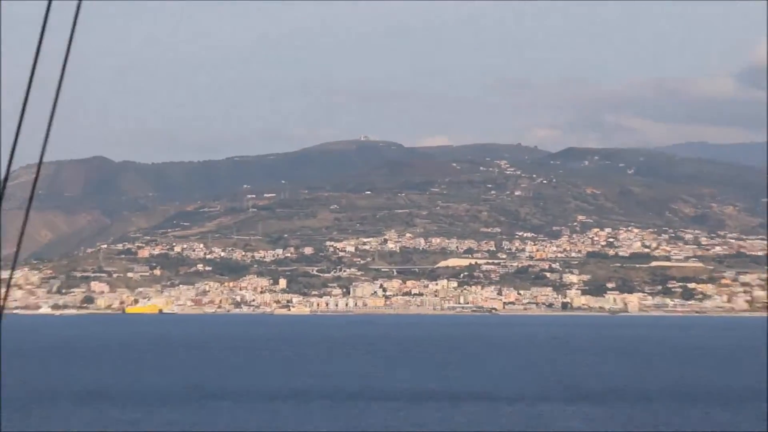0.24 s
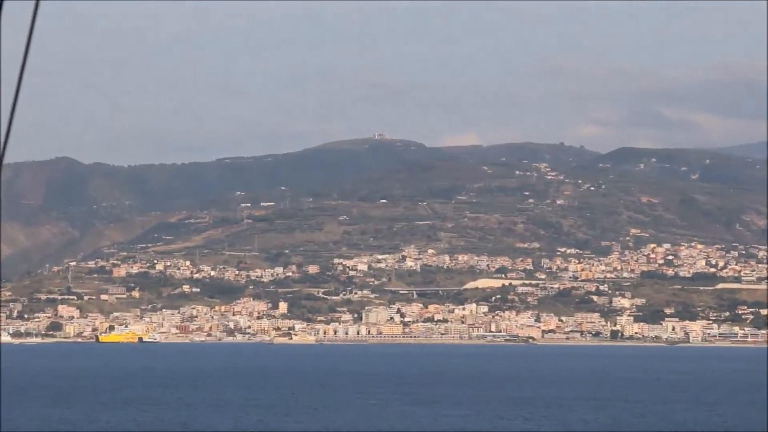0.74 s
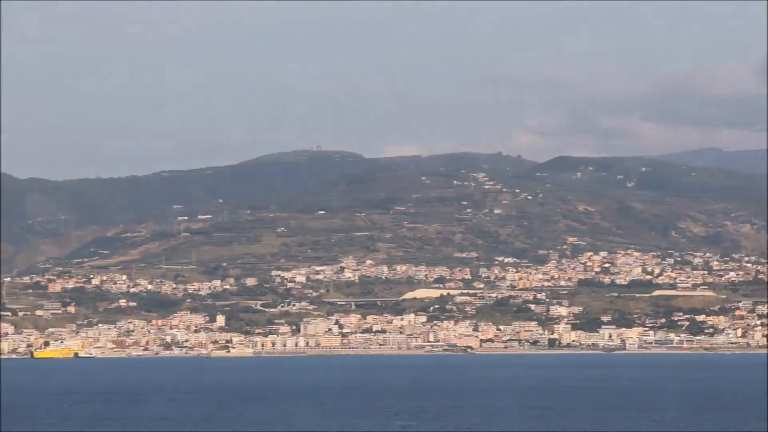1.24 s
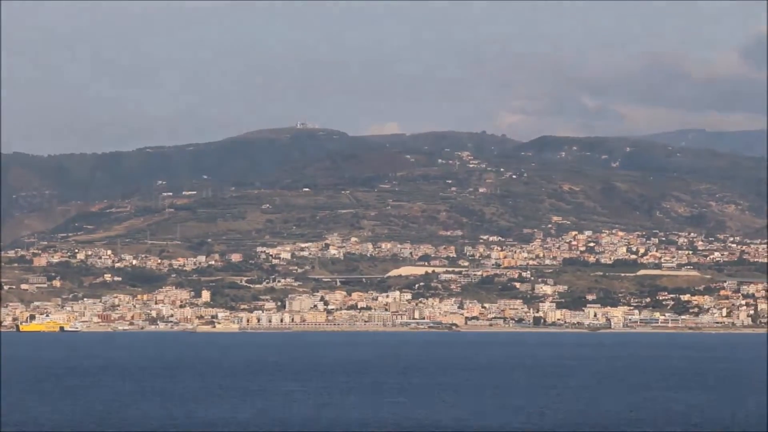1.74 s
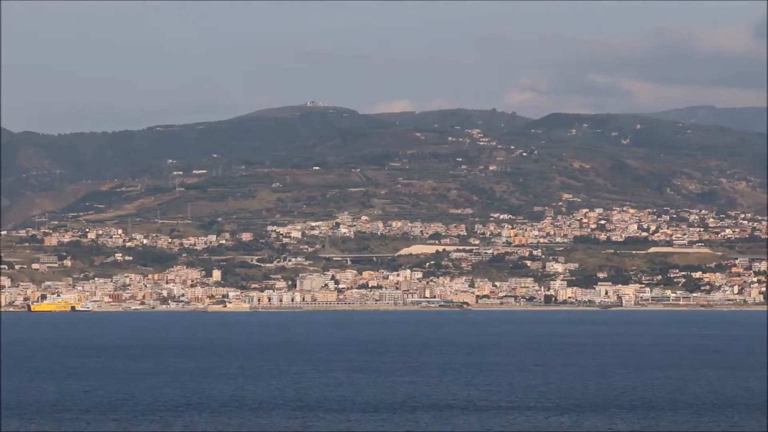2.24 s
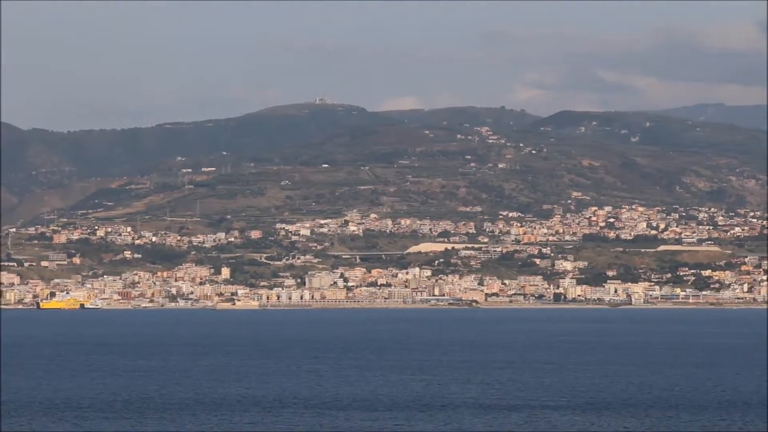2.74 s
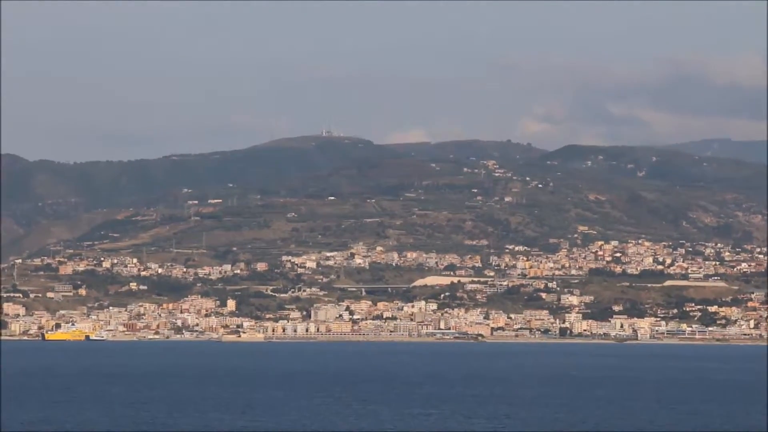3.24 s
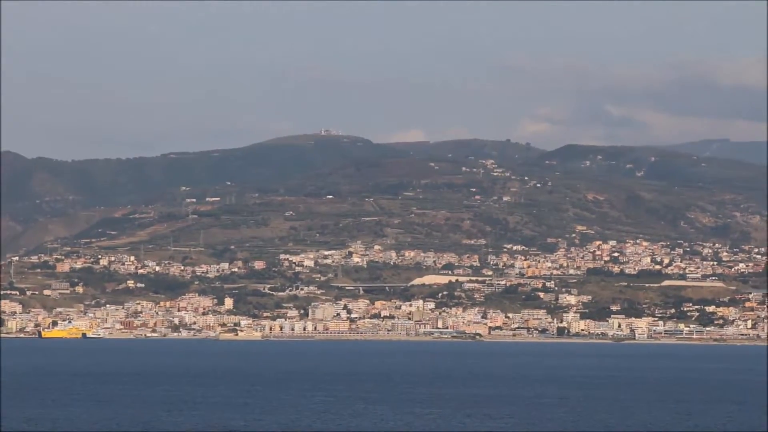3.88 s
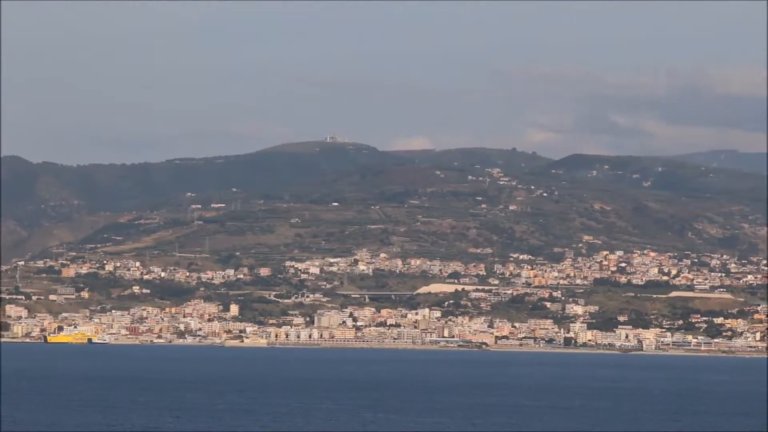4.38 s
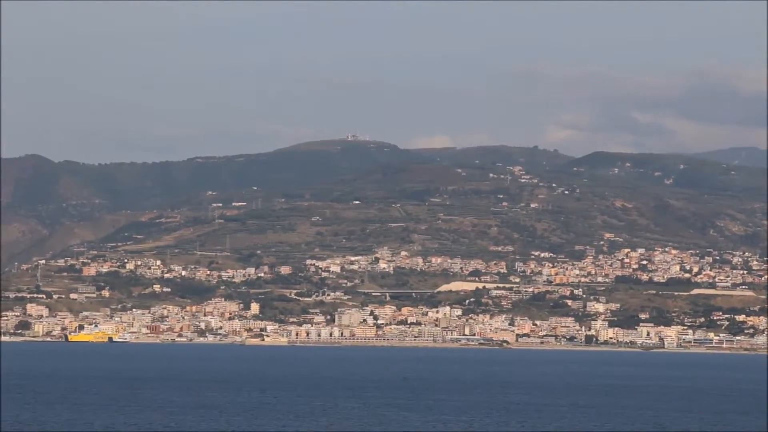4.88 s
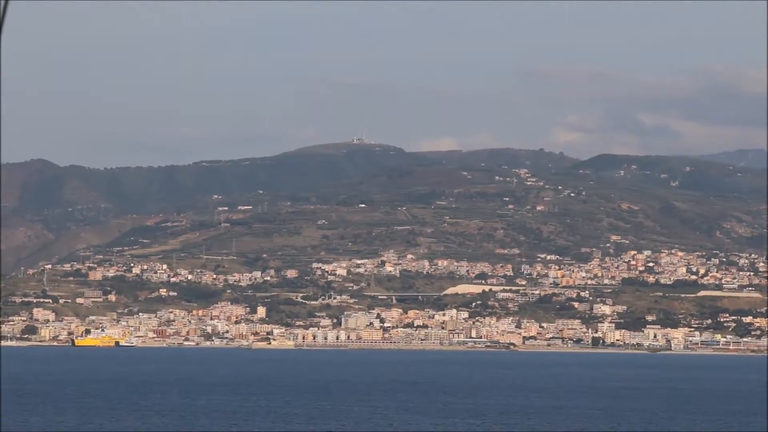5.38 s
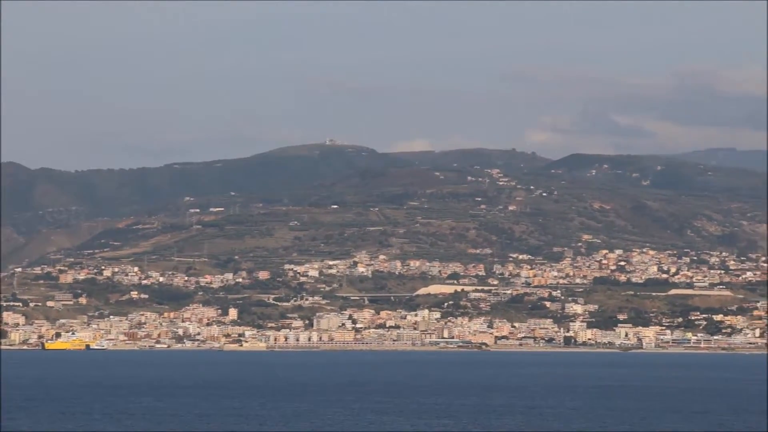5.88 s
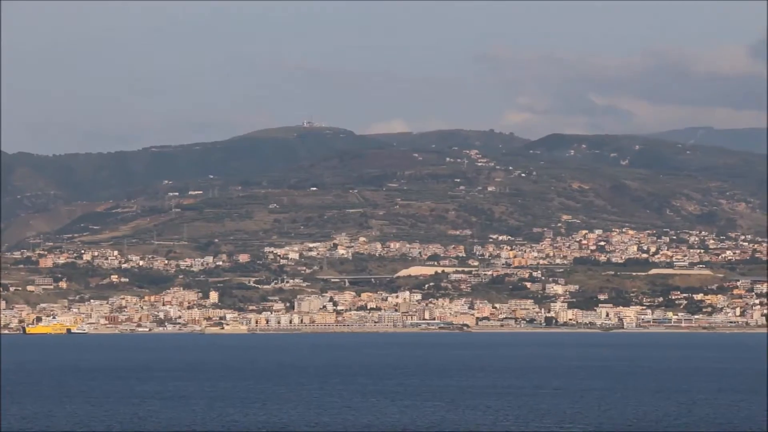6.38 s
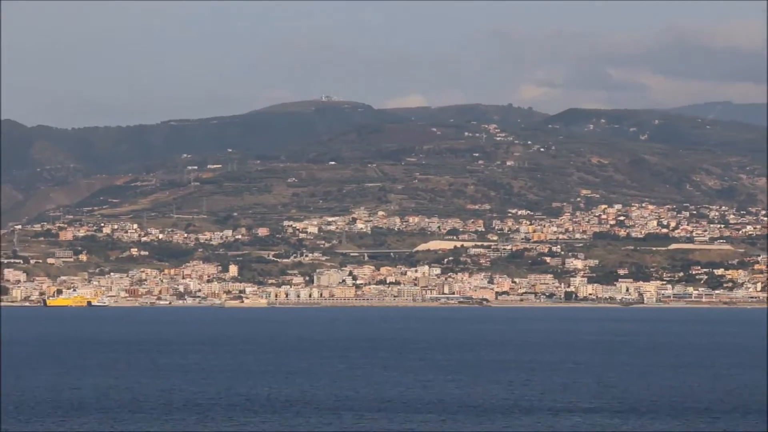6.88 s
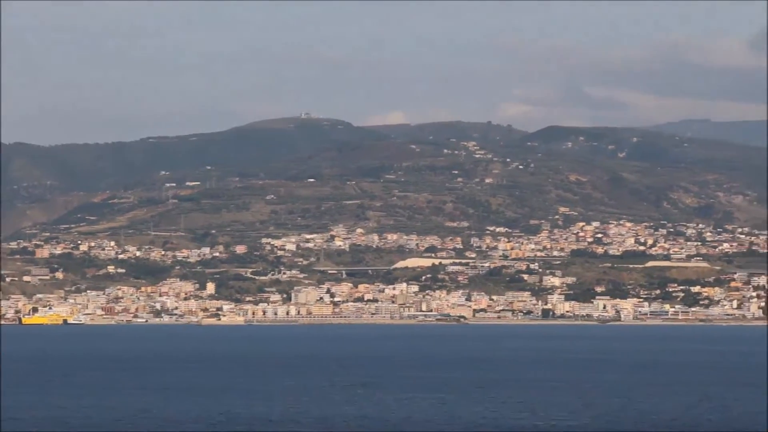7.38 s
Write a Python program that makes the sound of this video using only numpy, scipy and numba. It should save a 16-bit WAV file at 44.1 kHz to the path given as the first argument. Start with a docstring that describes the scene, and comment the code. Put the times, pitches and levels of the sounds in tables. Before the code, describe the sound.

On a ship's deck at sea, wind blows straight onto a stereo microphone, making a continuous rumble with soft thumps and crackles. It opens with a sharp, crackling gust on the right, followed by a very faint, brief high whistle. The buffeting carries on steadily, with scattered dry ticks from something loose and a soft wash of water behind it, then turns brighter on the right again at the end.

```python
"""Wind rumbles, thumps and crackles on the open deck of a moving ship, over a hiss of sea and air.
It hits the two ports (openings) of a small stereo microphone, each on its own. Swirls of air, called
eddies, sound louder and brighter when swept past faster: sharp ones crackle in one port at a time,
large ones thump. Something loose nearby ticks in both ports, and a thin, faint whistle comes and goes."""
import sys
import numpy as np
from scipy import signal
from scipy.fft import rfft, irfft, next_fast_len
from scipy.io import wavfile
from scipy.ndimage import uniform_filter1d
from numba import njit

SR = 44100
rng = np.random.default_rng(int(sys.argv[2]) if len(sys.argv) > 2 else 0)


def put_to_file(sound):
    """Save the sound as 16-bit audio at rate SR, in the file named by the first command-line argument."""
    columns = np.atleast_2d(sound).T  # one column per channel
    safe = np.clip(columns, -1, 1)
    whole_steps = np.round(safe * 32767)
    wavfile.write(sys.argv[1], SR, whole_steps.astype(np.int16))


N = 336262

# The gusts at each port. One octave more means air moving twice as fast.
# (time [s], left speed [octaves], right speed [octaves], left rumble [dB], right rumble [dB])
GUSTS = [(0.0, -0.11, 0.29, -15.5, -15), (0.202, 0.52, 0.1, -17.5, -17.5), (0.25, 0.4, 0.5, -17.5, -18),
         (0.348, -0.14, 0.14, -19, -21), (0.499, 0.3, 0.11, -17, -14), (0.591, 0.4, -0.1, -14, -20),
         (0.619, 0.74, 1.2, -13, -19), (0.699, 0.6, 1.3, -15.5, -18), (0.8, 0.7, 1.76, -17.5, -17),
         (0.932, -0.16, 1.16, -18.5, -19.5), (1.052, 0.48, 0.49, -16.5, -19.5), (1.253, 0.3, 0.3, -17, -19),
         (1.33, 0.3, 0.3, -17, -17), (1.498, 0.3, 0.32, -18, -18), (1.9, 0.6, 0.2, -15, -18),
         (2.048, 0.68, 0.1, -17, -16.5), (2.105, 0.38, 0, -17.5, -21), (2.202, 0.92, 0.013, -16.5, -17),
         (2.552, 0.6, 0.1, -18.5, -17), (2.9, 0.46, 0.1, -15, -18), (3.08, 0.7, 0.4, -16, -19),
         (3.25, 0.94, 0.49, -18, -18.5), (3.459, 0.8, 0.2, -17, -17.5), (3.52, 0.3, 0, -19.5, -19.5),
         (3.6, 0.5, 0.11, -15.5, -17.5), (3.748, 0.4, 0.2, -16, -16.5), (3.87, 0.4, 0.3, -16.5, -21.5),
         (3.919, 0.021, 0.1, -20.5, -16.5), (3.997, 0.29, 0.31, -14.5, -19.5),
         (4.15, 0.25, 0.5, -17.5, -14), (4.298, 0.17, 0.67, -15, -14.5), (4.45, 0.3, 0.3, -15, -17.5),
         (4.597, 0.54, 0.043, -17.5, -14.5), (4.902, 0.54, 0.71, -15, -19.5), (5.15, 0.31, 0.4, -16, -17),
         (5.403, 0.39, 0.22, -16, -19), (5.698, 0.48, 0.3, -16, -17), (6.0, 0.34, 0.36, -14.5, -20),
         (6.252, 0.4, 0.4, -15, -17.5), (6.499, 0.49, 0.5, -15.5, -16.5), (6.851, 0.28, 0.37, -17, -19),
         (7.0, 0.47, 1.54, -20, -15.5), (7.18, -0.23, 0.84, -20, -22), (7.23, -0.1, -0.1, -13, -23),
         (7.26, -0.04, -0.14, -14, -16), (7.295, -0.022, 0, -22, -20.5), (7.351, -0.26, 1.1, -12, -22),
         (7.398, -0.3, 0.8, -15, -21.5), (7.45, -0.3, 1.3, -15.5, -20), (7.62, -0.49, 1.38, -16, -20)]


def undb(db):
    """Turns decibels into a number to multiply by."""
    return 10 ** (np.asarray(db) / 20)


def unit(x):
    """Scales x to an average strength (rms) of 1."""
    return x / np.sqrt(np.mean(x ** 2))


def along(times, values):
    """Joins points with straight lines, giving a value for every sample."""
    return np.interp(np.arange(N) / SR, times, values)


@njit
def low_pass(x, hz, damping):
    """Dulls the sound above a frequency that can move every sample."""
    out, band, low = np.empty(len(x)), 0., 0.
    for i in range(len(x)):
        g = np.tan(np.pi * hz[i] / SR)
        change = (band + g * (x[i] - low)) / (1 + g * (g + damping))
        out[i] = low + g * change
        band, low = 2 * change - band, low + 2 * g * change
    return out


def colour(x, points):
    """Sets the tone of x from (frequency [Hz], level [dB]) points."""
    hz, db = np.transpose(points)
    size = next_fast_len(N)
    log_hz = np.log(np.arange(size // 2 + 1) * SR / size + 1)
    return irfft(rfft(x, size) * undb(np.interp(log_hz, np.log(hz), db)), size)[..., :N]


def band_rms(x, low_hz, high_hz):
    """Strength of x between two frequencies."""
    band = signal.butter(4, [low_hz, high_hz], "band", fs=SR, output="sos")
    return np.std(signal.sosfilt(band, x))


def wobble(per_second):
    """A smooth random curve of strength 1 that changes this often."""
    hold = int(SR / per_second)
    steps = np.repeat(rng.standard_normal(N // hold + 1), hold)
    return unit(uniform_filter1d(uniform_filter1d(steps, hold), hold)[:N])


def noise_pair(alike):
    """Left and right noise, from unrelated (0) to the same (1)."""
    mid, side = rng.standard_normal((2, N))
    return np.sqrt(1 + alike) * mid + np.sqrt(1 - alike) * side * np.array([[1], [-1]])


def stirring(unrest, swirls_per_second=900, spread_db=2.3, largest_db=9):
    """Tiny swirls push in or out over a fine, even noise; with less unrest their sizes are more alike."""
    arrives = rng.random(N) < swirls_per_second / SR
    size_db = np.minimum(spread_db * (1 + unrest * (rng.exponential(size=N) - 1)), largest_db)
    swirls = arrives * np.sign(rng.standard_normal(N)) * undb(size_db)
    power_share = .88 * (1 + unrest) / 2
    return np.sqrt(power_share) * unit(swirls) + np.sqrt(1 - power_share) * rng.standard_normal(N)


def rushes(port, eddy_rows, core_ms=7.1, slap_s=0.000091):
    """Air at a port spurts and drops; each sharp eddy speeds it up, slaps the port and calms the rest."""
    t = np.arange(N) / SR
    sharp, core, slaps = np.zeros((3, N))
    signs = np.sign(rng.standard_normal(len(eddy_rows)))
    for (time, side, octaves, ms), sign in zip(eddy_rows, signs):
        if round(side) == port:
            near = slice(max(int((time - .05) * SR), 0), int((time + .05) * SR))
            age = t[near] - time
            span_ms = ms * np.where(age < 0, 0.78, 1)  # it comes faster than it goes
            sharp[near] = np.maximum(sharp[near], octaves * np.exp(-(1500 * age / span_ms) ** 2))
            # long eddies sputter on around a short, steady core
            core[near] = np.maximum(core[near], octaves * np.exp(-(1500 * age / min(ms, core_ms)) ** 2))
            slaps[near] += sign * 0.56 * octaves * np.exp(-(age / slap_s) ** 2)
    spurts = .15 * wobble(40) + .36 * np.maximum(wobble(300), -.6) - .21
    lulls = 0.13 * np.minimum(wobble(29), 0) * np.exp(-2 * sharp)
    unrest = np.exp(-1.04 * core)  # 1 in open wind, less inside an eddy
    return sharp + unrest * spurts + lulls, slaps, unrest


def buffeting(port, eddy_rows, rumble_hz=121.8, finest_hz=1265, port_hz=7850):
    """Swirling air rumbles past a port: the faster it moves, the brighter it sounds."""
    fastest_octaves, db_per_octave = 3.14, 1.5
    times, *columns = np.transpose(GUSTS)
    gust, gust_db = along(times, columns[port]), along(times, columns[2 + port])
    rush, slaps, unrest = rushes(port, eddy_rows)
    speed = 2 ** (fastest_octaves * np.tanh((gust + rush) / fastest_octaves))
    air = low_pass(stirring(unrest) + slaps, rumble_hz * speed, 1.64)
    air = low_pass(air, np.minimum(finest_hz * speed ** 0.83, .4 * SR), 0.97)  # friction kills tiny eddies
    air = low_pass(air, np.full(N, float(port_hz)), 0.83)  # the port dulls the sharpest pushes
    db = gust_db + db_per_octave * rush + 0.5 * wobble(14)  # a sudden rush also pushes harder
    return air / band_rms(air, 26, 1000) * undb(db)


def hiss(sing_hz=5800, sing_width_hz=570, sing_db=-73.5):
    """Sea washes along the hull and air through the rigging; a narrow hiss flickers on the right."""
    # The tone of the wash: (frequency [Hz], relative level [dB])
    tone = [(300, 7), (1500, 0.5), (2500, -1.5), (3120, -3.5), (4280, -10.5), (5500, -12), (5950, -11.5),
            (6400, -17), (8270, -18.5), (14200, -29.5), (15600, -39)]
    # Level of the background hiss, which dips during the last strong gusts:
    # (time [s], level from 6.5 to 11 kHz [dB])
    levels = [(0.0, -65), (0.1, -70), (0.47, -72.5), (0.78, -73), (1.04, -70), (2.69, -68.5), (3.22, -69),
              (3.42, -70), (3.54, -71), (3.78, -66.5), (4.18, -68), (4.35, -66.5), (4.56, -69), (4.73, -68),
              (4.9, -67), (5.3, -69.5), (5.56, -70), (5.94, -70), (6.11, -65), (6.41, -66), (6.64, -68.5),
              (7.41, -73.5), (7.51, -77), (7.62, -75)]
    wash = colour(noise_pair(alike=0.07), tone)
    hiss_db = along(*np.transpose(levels)) + 2 * wobble(9)
    wash = wash / band_rms(wash, 6500, 11000) * undb(hiss_db)
    edges = [sing_hz - sing_width_hz / 2, sing_hz + sing_width_hz / 2]
    band = signal.butter(2, edges, "band", fs=SR, output="sos")
    sing = unit(signal.sosfilt(band, rng.standard_normal(N)))
    wash[1] += sing * undb(sing_db + 3.5 * wobble(30))
    return wash


def thumps(half_length_cycles=0.33):
    """Large, slow eddies push each port in and out once or twice."""
    # Heavy, low blows of air: (start [s], level [dB], pitch [Hz], left minus right [dB])
    blows = [(0.063, -9.5, 290, 16), (0.135, -6.5, 230, -17), (0.313, -15, 208, -13), (0.602, -7, 286, -5),
             (0.674, -12, 187, 8), (0.721, -8, 254, -17), (0.875, -7, 182, -14), (0.898, -10, 220, -16),
             (1.099, -9, 151, 15), (1.156, -12, 159, 12), (1.29, -7, 147, -6), (1.365, -10, 139, 11),
             (1.443, -9, 125, 16), (1.782, -10, 211, -15), (1.912, -4.5, 260, 9), (2.16, -12, 157, 13),
             (2.301, -7, 129, 11.5), (2.396, -22, 178, -1.5), (2.479, -6, 199, 11), (2.548, -8, 151, 20),
             (2.701, -9, 193, 14), (2.716, -7, 162, 15), (2.948, -2.5, 175, 2), (3.056, -10, 143, 10),
             (3.159, -24, 151, 3), (3.181, -17, 212, 6), (3.238, -11, 260, 12), (3.27, -9, 169, 20),
             (3.367, -8, 210, 21), (3.78, -8, 135, 6), (3.799, -15, 175, 7), (4.019, -7.5, 268, 7),
             (4.152, -10, 172, -10), (4.207, -3.5, 156, -1), (4.357, -15, 167, -4), (4.362, -7.5, 169, 13),
             (4.386, -12, 160, -6), (4.601, -13, 195, 12), (4.672, -13, 217, 18), (4.715, -6, 132, -3),
             (4.782, -6, 159, -1), (4.811, -5.5, 231, -9), (4.919, -5, 160, 15), (5.038, -5.5, 345, -20),
             (5.143, -5, 230, -4), (5.317, -12, 138, 6), (5.641, -6, 157, 11), (5.758, -17, 194, 1),
             (5.839, -9, 150, 5), (6.076, -7, 230, 7), (6.157, -13, 168, 16), (6.253, -2, 137, 3),
             (6.483, -15, 210, -2), (6.557, -9.5, 147, 13), (6.618, -17, 167, -9), (6.669, -8.5, 280, -10),
             (6.917, -7.5, 166, 14), (6.972, -7, 176, 16), (7.05, -8, 220, -18), (7.134, -8.5, 123, -10),
             (7.18, -8.5, 285, -22), (7.349, -5.5, 194, -15), (7.445, -3, 153, -19), (7.534, -8, 214, -15),
             (7.601, -8, 214, -18)]
    out = np.zeros((2, N + SR))
    for (time, db, hz, pan_db), phases in zip(blows, rng.random((len(blows), 2))):
        cycles = np.arange(int(3 * SR / hz)) * hz / SR - 1
        swell = np.exp(-(cycles / half_length_cycles) ** 2)
        push = swell * np.cos(2 * np.pi * (cycles + phases[:, None]))
        balance = undb(np.array([[pan_db], [-pan_db]]) / 2)
        start = int(time * SR)
        out[:, start:start + len(cycles)] += undb(db) * push * balance / balance.mean()
    return out[:, :N]


def eddies(weak_count=45, weak_octaves=(0.18, 0.9), weak_ms=(1., 6.5)):
    """Lists the sharpest eddies, plus weaker ones at random moments that crowd into the gusts."""
    # Sharp swirls of air: (time [s], port [0 left, 1 right], jump in speed [octaves], length [ms])
    sharpest = [(0.069, 0, 1.65, 9), (0.178, 0, 0.88, 6), (0.24, 1, 1.5, 5), (0.247, 1, 1.25, 14),
                (0.261, 1, 0.59, 1.9), (0.267, 0, 2.2, 4.6), (0.27, 1, 1.86, 43), (0.272, 1, 2.4, 1.7),
                (0.275, 1, 3.6, 2.3), (0.279, 1, 2.6, 3), (0.282, 1, 1.9, 2), (0.294, 0, 1.2, 6.3),
                (0.299, 1, 1.9, 1.8), (0.307, 1, 1.6, 7.3), (0.318, 1, 1.8, 8.9), (0.39, 1, 2.16, 4.6),
                (0.402, 1, 0.62, 3.9), (0.417, 0, 1.9, 5), (0.419, 1, 1.48, 59), (0.429, 1, 2.37, 5.1),
                (0.434, 0, 0.91, 5.1), (0.516, 1, 1.43, 3.3), (0.597, 0, 0.99, 2.2), (0.601, 0, 1.04, 5),
                (0.609, 1, 1.74, 5.2), (0.615, 1, 1.5, 4.9), (0.638, 1, 0.87, 7.2), (0.646, 1, 0.8, 5),
                (0.654, 1, 1.82, 14), (0.659, 0, 0.36, 8), (0.669, 1, 0.75, 3.3), (0.683, 1, 0.3, 5.6),
                (0.7, 1, 1.1, 5.2), (0.707, 1, 1.1, 4), (0.718, 1, 0.89, 12), (0.729, 1, 0.6, 3),
                (0.736, 1, 0.66, 5.1), (0.749, 0, 0.84, 4.6), (0.749, 1, 0.37, 3.8), (0.763, 0, 1.4, 1.9),
                (0.767, 1, 0.43, 1.2), (0.777, 1, 0.89, 2.4), (0.786, 1, 0.87, 5.1), (0.793, 1, 0.57, 2.2),
                (0.795, 0, 1.8, 5.7), (0.803, 0, 0.7, 5.4), (0.816, 1, 0.39, 12), (0.822, 1, 0.4, 5),
                (0.828, 0, 0.8, 6.7), (0.831, 1, 0.33, 6), (0.841, 1, 0.9, 4), (0.847, 1, 0.69, 2.8),
                (0.856, 1, 0.4, 5.4), (0.867, 1, 0.55, 1.8), (0.88, 1, 1.2, 4), (0.888, 1, 1.3, 5.2),
                (0.893, 1, 1.3, 4.4), (0.899, 1, 0.98, 3), (0.905, 1, 0.71, 16), (0.912, 1, 0.7, 3),
                (0.92, 1, 1.5, 3.2), (0.933, 1, 0.6, 3), (0.946, 1, 1.44, 1.8), (0.961, 1, 0.9, 3.5),
                (1.029, 0, 0.57, 3.2), (1.053, 1, 1.76, 9.7), (1.062, 1, 1.2, 10), (1.085, 1, 0.69, 4.5),
                (1.106, 0, 1.27, 6), (1.124, 0, 1.18, 7.3), (1.149, 0, 1.2, 4.4), (1.257, 1, 1.33, 19),
                (1.37, 0, 1.1, 8.9), (1.386, 1, 1.35, 9.3), (1.42, 1, 1.87, 4.3), (1.433, 1, 1.7, 4.9),
                (1.451, 0, 1.64, 18), (1.505, 0, 0.9, 3.2), (1.532, 0, 0.69, 7), (1.541, 0, 1.5, 5.4),
                (1.566, 1, 1.3, 13), (1.621, 0, 1.34, 17), (1.635, 1, 1.3, 3), (1.657, 0, 2.26, 2.3),
                (1.7, 1, 1.63, 3.6), (1.756, 0, 1.08, 9.9), (1.786, 1, 1.3, 6.5), (1.82, 1, 1.4, 5),
                (1.841, 0, 1.1, 5), (1.846, 1, 1.2, 8.1), (1.855, 0, 0.91, 21), (1.918, 0, 1.12, 3.9),
                (1.929, 0, 1, 16), (1.95, 1, 1, 5), (1.975, 0, 1.47, 2.8), (2.054, 0, 0.98, 10),
                (2.155, 1, 1.3, 23), (2.21, 0, 0.4, 15), (2.23, 0, 1.2, 6), (2.244, 0, 0.69, 4.1),
                (2.258, 0, 1, 3.9), (2.297, 0, 0.68, 4.1), (2.314, 0, 2.44, 5.2), (2.322, 0, 1.6, 0.98),
                (2.352, 0, 0.74, 1.9), (2.403, 1, 1.54, 17), (2.422, 0, 0.44, 2.9), (2.497, 0, 1.23, 19),
                (2.511, 0, 0.64, 4.4), (2.521, 0, 1.1, 4.3), (2.54, 0, 1.2, 6), (2.553, 0, 1.2, 3.6),
                (2.563, 0, 1.1, 14), (2.583, 0, 0.7, 5), (2.609, 1, 1.1, 8), (2.644, 0, 0.95, 18),
                (2.718, 0, 1.5, 8.6), (2.729, 0, 1.4, 4.4), (2.741, 0, 1.88, 6.9), (2.818, 0, 1.3, 3.5),
                (2.829, 1, 1.5, 8.5), (2.83, 0, 1.3, 6.6), (2.856, 1, 1.16, 5.6), (2.926, 0, 0.88, 6.7),
                (2.953, 0, 0.78, 39), (2.983, 0, 1.67, 6.9), (3.061, 0, 0.64, 9.7), (3.077, 1, 0.61, 5),
                (3.103, 1, 1.1, 11), (3.125, 0, 1, 5.5), (3.151, 0, 0.48, 3.6), (3.165, 0, 1.2, 9.9),
                (3.164, 1, 1.3, 19), (3.168, 1, 1.5, 2.8), (3.186, 0, 1.1, 3.9), (3.2, 1, 1.2, 12),
                (3.23, 0, 1.3, 7.1), (3.242, 0, 1.1, 6.2), (3.262, 0, 0.96, 21), (3.277, 0, 0.79, 6.5),
                (3.288, 1, 1.1, 3.4), (3.301, 0, 1.3, 4.2), (3.314, 0, 0.46, 3.1), (3.373, 0, 1.3, 4.1),
                (3.405, 0, 0.45, 4), (3.408, 1, 0.91, 3.7), (3.433, 0, 2.16, 8.1), (3.452, 0, 0.69, 5.4),
                (3.458, 0, 1.4, 9), (3.467, 0, 1.84, 4.9), (3.476, 0, 1.3, 9.8), (3.505, 0, 0.74, 5.2),
                (3.541, 0, 0.88, 10), (3.56, 0, 0.5, 11), (3.595, 0, 0.94, 8.5), (3.619, 0, 0.87, 4),
                (3.672, 0, 0.61, 4.6), (3.685, 0, 1.1, 4.6), (3.732, 1, 1.23, 15), (3.749, 1, 1.2, 5.4),
                (3.796, 0, 1.14, 23), (3.804, 0, 1.3, 4.5), (3.843, 0, 1, 4.5), (3.861, 0, 1.47, 5),
                (3.871, 1, 1.67, 26), (4.012, 1, 1.6, 6.7), (4.022, 0, 1.1, 28), (4.085, 0, 0.9, 5),
                (4.12, 0, 1.03, 7.2), (4.136, 1, 0.61, 13), (4.139, 0, 1.16, 22), (4.143, 1, 1.14, 3.3),
                (4.214, 1, 1.04, 5.3), (4.269, 1, 1.1, 3.2), (4.288, 1, 1, 12), (4.344, 0, 1.4, 7.2),
                (4.359, 1, 1.92, 3.9), (4.391, 0, 0.89, 10), (4.395, 1, 0.66, 12), (4.409, 0, 0.51, 4.3),
                (4.5, 0, 0.94, 6.5), (4.508, 1, 0.97, 4), (4.517, 1, 0.64, 20), (4.586, 0, 0.74, 10),
                (4.611, 0, 1.8, 9.7), (4.682, 1, 1.1, 3.6), (4.684, 0, 1.33, 32), (4.724, 1, 1.9, 3.8),
                (4.735, 1, 1.4, 7), (4.75, 1, 1.1, 4), (4.789, 1, 1.55, 6.2), (4.814, 1, 1.15, 5.9),
                (4.853, 1, 1.4, 32), (4.855, 0, 1.2, 5), (4.87, 0, 0.61, 9), (4.921, 0, 0.81, 11),
                (4.985, 0, 1.43, 3.3), (4.992, 1, 1.2, 7.3), (5.046, 1, 2.07, 13), (5.055, 1, 1.6, 5.7),
                (5.074, 1, 1, 5), (5.099, 0, 1.1, 11), (5.147, 1, 0.85, 17), (5.154, 1, 1.4, 2.5),
                (5.172, 0, 0.9, 5), (5.182, 1, 1.1, 8), (5.24, 1, 1.2, 9.7), (5.253, 0, 1.55, 2.1),
                (5.306, 0, 1.2, 4.4), (5.324, 0, 2.15, 6.7), (5.348, 1, 1.1, 16), (5.373, 0, 0.33, 3.9),
                (5.384, 1, 1.03, 30), (5.529, 1, 0.98, 19), (5.567, 1, 1.77, 9.7), (5.59, 1, 1.2, 6.4),
                (5.642, 0, 0.8, 3.7), (5.685, 0, 1.57, 16), (5.764, 1, 1.7, 11), (5.778, 0, 1.16, 8.7),
                (5.791, 0, 0.54, 5.7), (5.851, 1, 1.46, 19), (5.86, 0, 0.81, 8), (5.872, 0, 1.24, 14),
                (5.905, 0, 1.94, 0.74), (5.928, 0, 1.1, 2.3), (5.946, 1, 1.1, 31), (5.971, 0, 1, 7.2),
                (6.033, 0, 0.77, 2.9), (6.063, 1, 1.6, 2.8), (6.072, 1, 1.8, 9.8), (6.083, 0, 2.05, 1.3),
                (6.098, 1, 1.2, 6.3), (6.199, 1, 0.79, 5), (6.265, 0, 0.99, 16), (6.299, 1, 0.93, 7.8),
                (6.336, 1, 1.54, 9), (6.396, 0, 0.81, 28), (6.483, 0, 1.68, 10.4), (6.486, 1, 0.75, 12),
                (6.498, 1, 1.1, 4.3), (6.551, 1, 1, 6.6), (6.565, 0, 0.52, 6.9), (6.623, 1, 0.96, 5.5),
                (6.624, 0, 0.71, 3.8), (6.639, 1, 0.9, 7.6), (6.671, 1, 1.17, 17), (6.679, 0, 1, 8.1),
                (6.695, 0, 0.74, 10), (6.723, 1, 1.7, 19), (6.739, 0, 1.2, 9.2), (6.766, 1, 1.58, 9.1),
                (6.781, 0, 1.4, 11), (6.916, 0, 1.1, 11), (6.944, 0, 1.5, 3.8), (6.966, 1, 0.41, 13),
                (7.0, 1, 1.37, 7), (7.012, 1, 0.31, 6), (7.024, 1, 0.8, 9.4), (7.038, 1, 0.51, 5.1),
                (7.047, 1, 1.1, 1.6), (7.058, 1, 0.78, 2), (7.069, 1, 1.18, 4.7), (7.085, 1, 0.56, 3.6),
                (7.118, 0, 1.6, 5.6), (7.121, 1, 1.3, 3.2), (7.142, 1, 1.88, 16), (7.152, 1, 2.07, 11),
                (7.165, 1, 1.4, 4.8), (7.176, 1, 1.8, 14), (7.186, 1, 2.06, 4.7), (7.209, 1, 2.2, 5.7),
                (7.253, 1, 0.8, 10), (7.309, 1, 1.86, 16), (7.328, 1, 2.08, 15), (7.335, 1, 2, 3.4),
                (7.356, 1, 1.4, 2.4), (7.362, 1, 1.93, 17), (7.372, 1, 1.7, 14), (7.378, 1, 1.1, 5.9),
                (7.407, 1, 0.64, 9.7), (7.431, 1, 1.7, 15), (7.441, 1, 1.1, 11), (7.451, 1, 1.8, 5.8),
                (7.457, 1, 1.2, 3), (7.466, 1, 1.7, 6), (7.484, 1, 0.45, 5.1), (7.497, 1, 0.4, 5),
                (7.509, 1, 0.78, 2.5), (7.536, 1, 1.2, 6.9), (7.547, 1, 1.64, 11), (7.562, 1, 1.3, 4.7),
                (7.578, 1, 0.79, 7.8), (7.592, 1, 1.2, 9.8), (7.605, 1, 1.3, 11)]
    times, *speeds = np.transpose(GUSTS)[:3]
    both_ports = np.concatenate([along(times, speed) for speed in speeds])  # left, then right
    odds = np.cumsum(2 ** (1.5 * both_ports))  # faster air brings more eddies
    when, jump, length = rng.random((weak_count, 3)).T
    port, sample = np.divmod(np.searchsorted(odds, when * odds[-1]), N)
    (small, big), (short, long) = weak_octaves, weak_ms
    octaves = small + (big - small) * jump ** 2
    ms = short * (long / short) ** length
    return np.vstack([sharpest, np.transpose([sample / SR, port, octaves, ms])])


def cracks(port, eddy_rows, base_db=-76, db_per_octave=17.5, top_octaves=3.64, half_length_ms=0.99):
    """A thin, bright crack, like a brief overload, tops each eddy, louder in faster air."""
    # The tone of a crack: (frequency [Hz], relative level [dB])
    tone = [(1000, 10.5), (2000, 8.5), (3200, 10.5), (6000, -2), (10000, -17), (15500, -30.5)]
    gust_times, *speeds = np.transpose(GUSTS)[:3]
    times, _, jumps, _ = eddy_rows[np.round(eddy_rows[:, 1]) == port].T
    octaves = np.minimum(np.interp(times, gust_times, speeds[port]) + jumps, top_octaves)
    peaks = np.zeros(N)
    peaks[(times * SR).astype(int)] = undb(base_db + db_per_octave * octaves)
    ms = np.arange(-200, 201) / SR * 1000
    bursts = np.convolve(peaks, np.exp(-(ms / half_length_ms) ** 2), "same")
    return bursts * unit(colour(rng.standard_normal(N), tone))


def ticks(rise_s=0.00028, fade_ms=2.08, rattle_ms=10, rattle_db=-13.5):
    """Something loose makes dry snaps, each a burst of noise with a brief rattle after it."""
    # The ticks: (time [s], rough peak level of the treble [dB], left minus right [dB])
    hits = [(0.7627, -52, 7), (1.096, -50, -2), (1.1056, -43, 2), (1.136, -47, -5), (1.679, -41.5, 4),
            (2.106, -41.5, 5), (2.1814, -38.5, 4), (2.2638, -47, 6), (2.295, -44, -2), (2.438, -34.5, 5),
            (2.4495, -48, -1.5), (2.7355, -46, 1), (2.8125, -46, 2), (2.8193, -34, 1), (2.831, -54, 2),
            (2.954, -46, 4), (3.022, -35.5, 3), (3.2198, -41, -3), (3.301, -44.5, 0), (3.313, -47, 3),
            (3.336, -48, 3), (3.585, -47, 5), (3.6524, -37, 7), (3.659, -40.5, -5), (3.7535, -40, 6),
            (3.85, -42, 6), (4.031, -39.5, 3), (4.06, -40, 5), (4.119, -28, 5.5), (4.2643, -43.5, 8),
            (4.639, -45, 3.5), (4.6467, -33.5, 3), (4.9667, -40, 2), (5.497, -47, 6), (5.519, -54, 6),
            (5.635, -48, -1), (5.654, -37, 7.5), (5.9795, -40.5, 4), (6.027, -41, 7), (6.032, -37, 7),
            (6.105, -37, 2), (6.1194, -45, 3), (6.204, -46, 1.0), (6.2347, -40.5, 3), (6.373, -27.5, 3),
            (6.4553, -41, 5), (6.537, -36, 5), (6.5484, -39.5, 1), (6.5595, -42, 3), (6.823, -46.5, 7)]
    # How a tick rings, one list for the left and one for the right: (frequency [Hz], relative level [dB])
    tones = ([(700, -18), (1500, -7.5), (3000, 0.5), (4000, -11), (5200, 2), (6000, -6.5), (7400, -10.5),
             (7900, -14), (8400, -7), (9200, -17.5), (15500, -27)], [(700, -17.5), (1500, 0), (2200, -5.5),
             (3800, 7), (4500, -1), (6000, -6), (8100, -7), (9500, -15.5), (10700, -11), (12000, -21),
             (15500, -25)])
    t = np.arange(SR // 40) / SR
    fade = np.exp(-1000 * t / fade_ms) + undb(rattle_db) * np.exp(-1000 * t / rattle_ms)
    burst = fade * (1 - np.exp(-t / rise_s))
    loudness = np.zeros((2, N + SR))
    for time, db, pan_db in hits:
        start = int(time * SR)
        loudness[:, start:start + len(t)] += undb(db + np.array([[pan_db], [-pan_db]]) / 2) * burst
    snap = np.array([colour(noise, tone) for noise, tone in zip(noise_pair(alike=0.51), tones)])
    snap[1] = np.roll(snap[1], 5)  # it reaches the right port 5 samples later
    return loudness[:, :N] * snap / band_rms(snap, 6730, 14000) / 2  # peaks are about twice the rms


def whistle(pitch_hz=4905, arch_hz=55, fade_s=.022, waver_db=3.5):
    """A thin, unsteady tone sounds three times, its pitch rising and falling a little each time."""
    # The short whistles: (start [s], length [s], level [dB])
    notes = [(.965, .14, -63), (1.1, .045, -68), (1.16, .065, -67.5)]
    t = np.arange(N) / SR
    loudness, arch = np.zeros((2, N))
    for start, length, db in notes:
        ramp = np.minimum((t - start) / 2, start + length - t) / fade_s  # swells half as fast as it fades
        loudness += undb(db) * np.clip(ramp, 0, 1)
        arch += np.sin(np.pi * np.clip((t - start) / length, 0, 1))
    phase = 2 * np.pi * np.cumsum(pitch_hz + arch_hz * arch) / SR
    return np.sqrt(2) * loudness * undb(waver_db * wobble(60)) * np.sin(phase)


def scene():
    """Adds the wind at each port to the other sounds on deck."""
    eddy_rows = eddies()
    wind = np.array([buffeting(port, eddy_rows) + cracks(port, eddy_rows) for port in (0, 1)])
    return wind + thumps() + ticks() + hiss() + whistle()


def record(dry):
    """The microphone cuts the deep bass, its amplifier clips the loudest peaks, the top treble is cut."""
    bass_hz, top_hz = 79, 15800
    thinned = signal.sosfilt(signal.butter(2, bass_hz, "high", fs=SR, output="sos"), dry)
    clipped = thinned / (1 + thinned ** 12) ** (1 / 12)
    return signal.sosfilt(signal.ellip(12, .2, 60, top_hz, fs=SR, output="sos"), clipped)


dry = scene()
out = record(dry)
put_to_file(out)
```